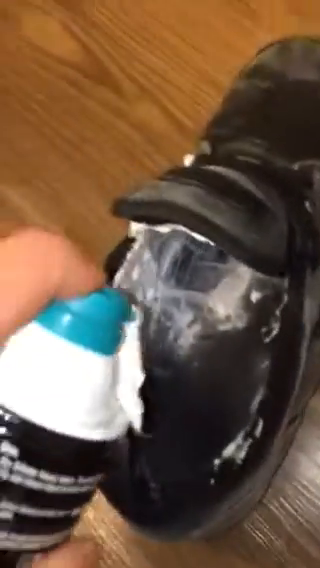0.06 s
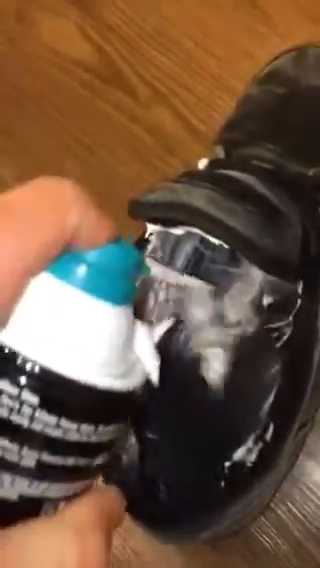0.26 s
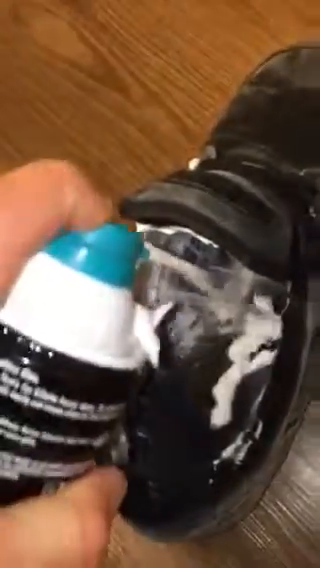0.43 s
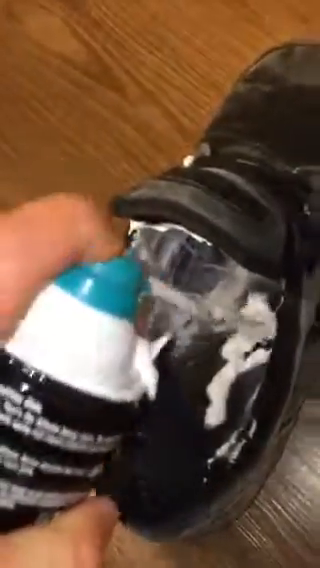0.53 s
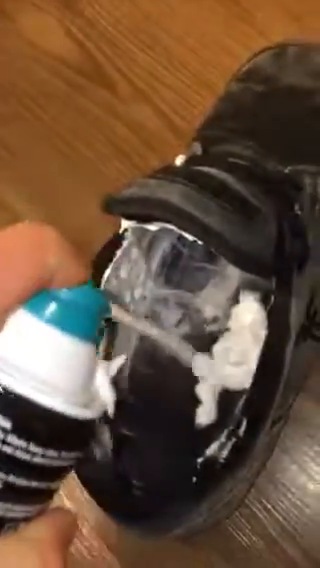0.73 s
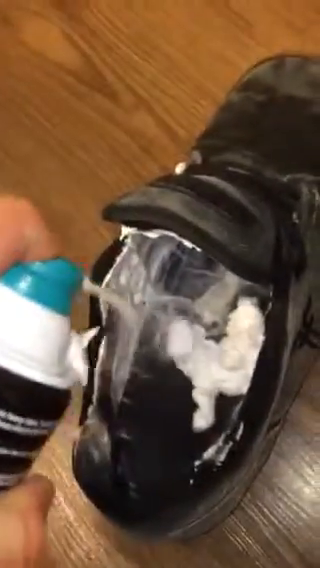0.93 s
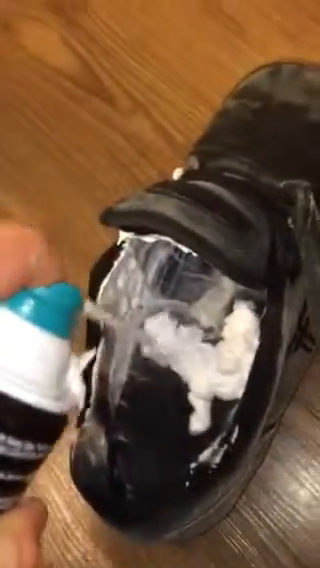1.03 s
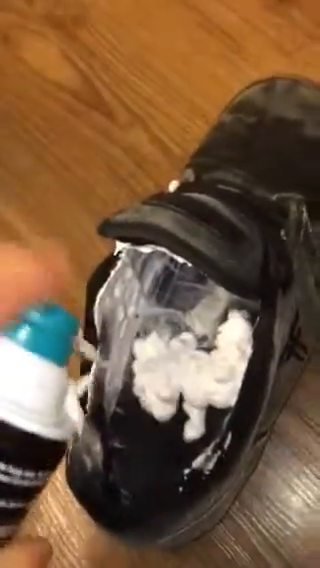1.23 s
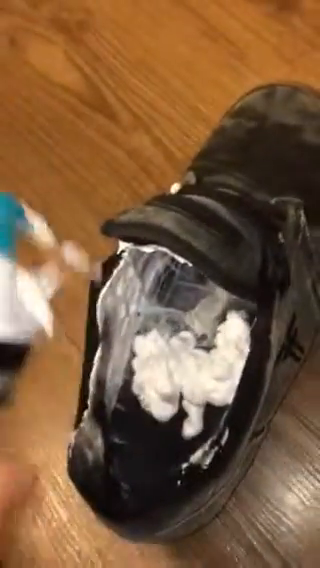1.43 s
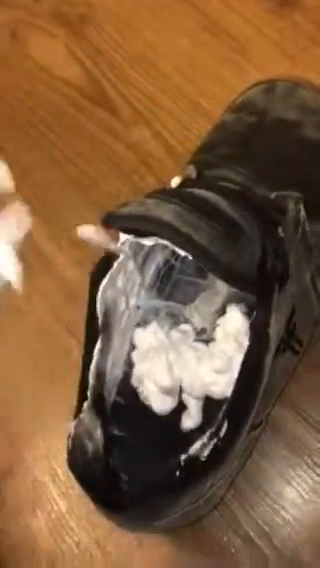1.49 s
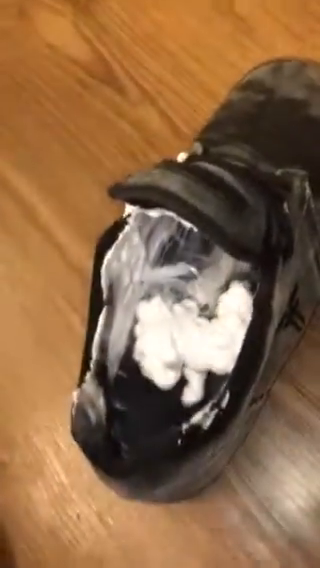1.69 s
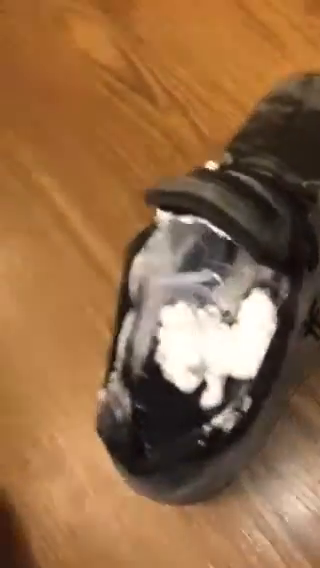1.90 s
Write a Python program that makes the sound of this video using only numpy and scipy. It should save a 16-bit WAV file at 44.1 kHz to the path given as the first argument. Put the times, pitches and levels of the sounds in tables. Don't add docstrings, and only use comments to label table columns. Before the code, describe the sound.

Spray foam squirts from a pressurised can into a shoe, heard close on a phone in a quiet room. Low room hum until 0.16 s, then a faint valve tick and a loud, spitting gassy burst around 0.2-0.3 s. A softer, dense bubbly hiss follows, crackling with little pops and growing stronger until it cuts off at 1.3 s. Short room ring, then faint ticks near 1.34, 1.7 and 1.95 s.

```python
import sys
import numpy as np
from scipy import signal
from scipy.fft import rfft, irfft
from scipy.io import wavfile
from scipy.ndimage import uniform_filter1d

SR = 44100
rng = np.random.default_rng(int(sys.argv[2]) if len(sys.argv) > 2 else 0)


def voltage_ratio(level):
    return 10 ** (np.asarray(level, float) / 20)


def transcribe(u):
    v = np.clip(np.atleast_2d(u).T, -1, 1)
    q = np.round(v * 32767).astype(np.int16)
    wavfile.write(sys.argv[1], SR, q)


N = 85995

# (frequency [Hz], density [dB per Hz])
AIR_WASH = [(12, -81), (20, -67), (59, -9.5), (180, -4), (213, -11), (465, -18.5), (767, -29), (932, -27.5),
            (15500, -54)]
# (frequency [Hz], width [Hz], level [dB])
HUM_BANDS = [(77.4, 29.4, -57.5), (114, 16.7, -56.5), (145.7, 9.7, -67), (184.3, 5.4, -58),
             (289.3, 8.1, -78.5), (390, 13, -76), (579.4, 25, -71.5), (1233, 30, -81), (467, 15, -69),
             (924, 30, -76)]
# (frequency [Hz], time to fall 60 dB [s])
ROOM_DECAY = [(500, .22), (1300, .35), (3000, .3), (4500, .4), (6500, .29), (12000, .22)]
# (frequency [Hz], width [Hz], depth [dB])
MIC_DIPS = [(4870, 310, -5), (10220, 1140, -5.5), (2500, 250, -4)]
# (time [s], level [dB])
TICKS = [
    (.162, -47),
    (1.339, -50),
    (1.7115, -45.5),
    (1.947, -55),
]
# (time [s], flow [dB], gas in the jet [dB], aim into the hollow [dB])
VALVE = [(0.158, -72, -19, -11), (0.161, -48, -19, 1), (0.185, -41.5, -15, -0.5), (0.206, -38.5, 9, 2.5),
         (0.252, -29, 3, -2), (0.289, -29, -6, 3.5), (.303, -33.5, 11.5, 0.5), (.325, -42.5, 3, -11),
         (.385, -40, -1.5, -1), (.6, -38, -1, 3.5), (.75, -36, -0.5, 1), (.86, -34.5, -1, 0.5),
         (1.0, -35.5, 1, 2), (1.06, -34, -2.5, 0), (1.2, -33.5, -1.5, 1.5), (1.272, -36.5, 3, 9.5),
         (1.287, -36, 0, -6), (1.296, -81, -3, -11)]
# (frequency [Hz], width [Hz], lift [dB])
SHOE_MODES = [(397.4, 85, 24.5), (960, 43, 2.5), (1370, 550, 3), (2090, 510, 7.5), (2706, 110, 5.5),
              (3057, 110, 5), (3756, 130, 4), (4525, 286, 6), (5430, 280, 6), (6550, 180, 4.5),
              (7540, 500, 0.5), (8930, 270, 5)]
# (frequency [Hz], level [dB])
HISS_COLOUR = [(600, -46), (1500, -8.5), (4000, -16.5), (7000, -24.5), (10000, -16), (13000, -22),
               (15800, -20)]
# (time [s], level [dB], centre [Hz], length [ms])
SPITS = [(0.1712, -53, 8300, 2.1), (0.1809, -47, 10300, 2.4), (0.1896, -42, 10800, 2.1),
         (0.1937, -32.5, 8300, 2.6), (0.216, -29, 10400, 1.9), (0.2239, -38, 10300, 2.7),
         (0.2286, -39, 10900, 2.0), (0.2327, -41, 10200, 2.7), (0.2409, -36, 11200, 2.5),
         (0.2543, -40.5, 11990, 2.3), (0.275, -38.5, 9900, 2.0), (0.2943, -39, 9960, 4.1),
         (0.3064, -32, 12100, 2.3), (0.312, -46, 12000, 2.3), (0.431, -55.5, 11600, 1.8),
         (0.5546, -33, 8100, 1.9), (0.5623, -54, 9400, 2.9), (0.5932, -49, 9200, 1.4),
         (0.612, -43, 8900, 1.4), (0.6204, -39, 8600, 1.2), (0.6733, -55, 9100, 2.1),
         (0.7134, -41, 8400, 1.1), (0.7211, -39, 8500, 1.9), (0.753, -43, 9200, 1.9),
         (0.7611, -48.5, 8800, 2.1), (0.8144, -47, 9400, 1.8), (0.8444, -42, 8800, 1.5),
         (0.8507, -39, 8150, 3.5), (0.8707, -42, 11700, 1.4), (0.8808, -39, 8300, 2.5),
         (0.924, -26.5, 8800, 1.9), (0.939, -40, 10200, 1.4), (0.9703, -38, 8900, 4.2),
         (0.985, -33.5, 8400, 1.9), (0.9925, -35, 9250, 2.5), (0.9998, -33, 8700, 1.5),
         (1.0167, -39, 9000, 1.3), (1.0306, -43, 10900, 1.5), (1.094, -44, 10000, 4.8),
         (1.1152, -41, 8600, 3), (1.136, -37.5, 10400, 4), (1.1435, -36.5, 9400, 1.2),
         (1.1706, -35.5, 9000, 1.4), (1.1786, -38, 9700, 1.3), (1.2295, -43, 9000, 1.1),
         (1.242, -47, 8600, 2.1), (1.2467, -40, 9400, 4.1), (1.2507, -47, 12600, 4.4),
         (1.272, -39, 9000, 1.5), (1.2831, -48, 9600, 1.9)]
# (time [s], level [dB], pitch [Hz], length [ms])
LARGE_POPS = [(0.172, -38.5, 2090, 2.1), (0.173, -36.5, 4330, 1.4), (0.2022, -33, 1754, 2.3),
              (0.202, -30, 5480, 1.3), (0.2104, -24, 2080, 1.54), (0.2119, -32, 5517, 3),
              (0.2165, -27.5, 6780, 2), (0.2237, -23.5, 2737, 1.66), (0.2234, -22, 5500, 1.0),
              (0.2323, -28, 5400, 1.7), (0.2407, -31.5, 4330, 2.1), (0.2547, -16.5, 2500, 1.41),
              (0.2536, -23, 3990, 3.1), (0.2897, -24.5, 1992, 1.98), (0.2837, -24, 2118, 3.1),
              (0.2637, -19.5, 3086, 1.88), (0.2758, -20, 2047, 1.8), (0.2808, -27, 5470, 2.4),
              (0.2891, -24, 4110, 2.5), (0.2868, -21, 2422, 1.6), (0.2707, -21, 2713, 1.57),
              (0.2925, -30, 3164, 1.0), (0.3259, -30, 3145, 1.5), (0.293, -29, 6620, 1.5),
              (0.3031, -27, 6440, 1.65), (0.4324, -33, 6895, 1.3), (0.4595, -35, 6895, 1.3),
              (0.4566, -27.5, 4425, 1.44), (0.496, -38.5, 6780, 1.3), (0.496, -32, 4500, 1.74),
              (0.5987, -26, 4240, 1.3), (0.6047, -28, 4139, 1.14), (0.6407, -35.5, 5862, 2.1),
              (0.7129, -30.5, 5780, 2.5), (0.7209, -37, 7929, 1.3), (0.7253, -26, 3400, 1.3),
                (0.7523, -31.5, 6895, 1.7), (0.825, -31.5, 6895, 1.7), (0.85, -38, 7929, 2.4),
                (0.8518, -25, 6140, 1.3), (0.857, -24.5, 3794, 3.9), (0.8805, -35.5, 7900, 2.15),
                (0.9223, -27, 6850, 1.3), (0.9371, -31, 3770, 1.7), (0.9796, -30, 2080, 1.7),
                (0.984, -29, 5890, 1.3), (0.9854, -36, 7660, 1.3), (0.9927, -39, 7929, 1.3),
                (0.9999, -35, 8273, 1.0), (1.0917, -34, 7929, 3.3), (1.1189, -26, 4483, 4.1),
                (1.1323, -27, 3420, 1.64), (1.135, -27.5, 5780, 3.5), (1.1594, -23.5, 1373, 1.82),
                (1.221, -43, 6895, 1.3), (1.23, -37, 8800, 1.2), (1.24, -34, 7584, 1.3),
                (1.2597, -27, 3480, 4.3), (1.2656, -34.5, 1063, 1.4), (1.2723, -21, 3910, 1.0),
                (1.2512, -36.5, 4170, 2.35), (1.194, -28, 4380, 3)]
# (frequency [Hz], density [dB per Hz])
FOAM_COLOUR = [(500, 4.5), (927, 2.5), (2070, -4), (3630, -2.5), (5590, -8), (8800, -21.5), (10500, -42),
               (15500, -48)]

TIME = np.arange(N) / SR
FLOW, GAS, AIM = 1, 2, 3


def evened(x):
    return x / np.sqrt(np.mean(x ** 2) + 1e-20)


def read(points, hz):
    f, value = np.transpose(points)
    return np.interp(np.log(hz + 1), np.log(f + 1), value)


def colour(x, db_at):
    hz = np.fft.rfftfreq(len(x), 1 / SR)
    return irfft(rfft(x) * voltage_ratio(db_at(hz)), len(x))


def peaks_db(modes, hz):
    return sum(db / (1 + (2 * (hz - f) / width) ** 2) for f, width, db in modes)


def bell_db(hz, centre, spread):
    return -20 * np.log10(1 + (np.log((hz + 1) / centre) / spread) ** 4)


def drift(ms):
    hz = np.fft.rfftfreq(N, 1 / SR)
    slow = rfft(rng.standard_normal(N)) * np.exp(-(hz * ms / 1000) ** 2)
    return evened(irfft(slow, N))


def add(mix, s, sound):
    part = mix[round(s * SR) - len(sound) // 2:][:len(sound)]
    part += sound[:len(part)]


def air():
    out = voltage_ratio(-53) * evened(colour(rng.standard_normal(N), lambda hz: read(AIR_WASH, hz)))
    for f, width, db in HUM_BANDS:
        band = colour(rng.standard_normal(N), lambda hz: -20 * np.log10(1 + (2 * (hz - f) / width) ** 2))
        band = band / abs(signal.hilbert(band)) ** .4
        wander_db = 2.5 * drift(ms=180)
        out = out + voltage_ratio(db + wander_db) * evened(band)
    return out


def room(x):
    taps = np.zeros(SR // 2)
    at = np.arange(200, SR // 2 - 20, 20)
    taps[at + rng.integers(0, 20, len(at))] = rng.choice([-1., 1.], len(at))
    hz, t, z = signal.stft(taps, SR, nperseg=256)
    decay = voltage_ratio(-60 * t / read(ROOM_DECAY, hz)[:, None])
    tail = signal.istft(z * decay, SR, nperseg=256)[1]
    return signal.fftconvolve(x, tail / np.linalg.norm(tail))[:N]


def ticks():
    snap_hz, body_hz, decay_ms, dull_hz = 2100, 650, 1.2, 2800
    out, t = np.zeros(N), np.arange(400) / SR
    body = voltage_ratio(-3) * np.exp(-t * 400 / decay_ms) * np.sin(2 * np.pi * body_hz * t)
    for s, db in TICKS:
        ragged = np.sin(2 * np.pi * snap_hz * t) + .6 * rng.standard_normal(400)
        snap = np.exp(-t * 1000 / decay_ms) * ragged + body
        add(out, s, voltage_ratio(db) * np.r_[0 * t, snap])
    return colour(out, lambda hz: -10 * np.log10(1 + (hz / dull_hz) ** 2))


def valve(column):
    rows = np.array(VALVE)
    return np.interp(TIME, rows[:, 0], rows[:, column])


def shoe_db(hz):
    foot_hz, floor_db = 760, -18
    foot = 1 / (1 + (foot_hz / (hz + 1)) ** 16) + voltage_ratio(2 * floor_db)
    return peaks_db(SHOE_MODES, hz) + 10 * np.log10(foot)


def spits():
    out, t = np.zeros(N), (np.arange(600) - 300) / SR * 1000
    for (s, db, hz, ms), rag in zip(SPITS, rng.standard_normal((len(SPITS), 600))):
        u = t / ms
        jet = colour(rag, lambda f: bell_db(f, hz, spread=0.17))
        shape = np.exp(-np.where(u < 0, 5, 2) * u ** 2)
        add(out, s, voltage_ratio(db - 4) * evened(jet * shape) * np.sqrt(np.mean(shape ** 2)))
    return out


def blip(hz, ms, rag):
    glide, roughness, puff_db = .05, .45, -5
    u = (np.arange(600) - 300) / SR * 1000 / ms
    tone = np.sin(2 * np.pi * np.cumsum(hz * (1 + glide * u)) / SR)
    wobble = 1 + roughness * evened(uniform_filter1d(rag, size=12))
    puff = evened(colour(rag[::-1], lambda f: bell_db(f, hz, spread=.3)))
    return np.exp(-2.8 * u ** 2) * wobble * tone + voltage_ratio(puff_db) * np.exp(-4.5 * u ** 2) * puff


def large_pops():
    out, rows = np.zeros(N), LARGE_POPS
    for (s, db, hz, ms), rag in zip(rows, rng.standard_normal((len(rows), 600))):
        add(out, s, voltage_ratio(db - 1.2) * blip(hz, ms, rag))
    return out


def crackles():
    per_s, low_hz, top_hz, shortest_ms = 220, 3500, 8500, .55
    out = np.zeros(N)
    flow_db = np.minimum(valve(FLOW), -34) + .5 * valve(GAS)
    for at, pitch, size, length in rng.random((int(per_s * N / SR), 4)):
        hz = low_hz * (top_hz / low_hz) ** pitch
        n = int(400 + at * (N - 800))
        burst = blip(hz, shortest_ms * (1 + length), rng.standard_normal(600))
        add(out, n / SR, voltage_ratio(flow_db[n] - 12 + 11.6 * size ** 2) * burst)
    return out


def nozzle():
    hiss = evened(colour(rng.standard_normal(N), lambda hz: read(HISS_COLOUR, hz) + shoe_db(hz)))
    flicker_db = 1.6 * drift(ms=14)
    return voltage_ratio(-11.5 + valve(FLOW) + valve(GAS) + flicker_db) * hiss


def foam(count=32):
    bubbles_per_s, cycles, size_db = 6500, 2.91, 1.5
    bursts = rng.random(N) < bubbles_per_s / SR
    size = voltage_ratio(size_db * np.minimum(rng.exponential(1, N), 4)) * bursts
    kind, out = rng.integers(0, count, N), np.zeros(N)
    for k, hz in enumerate(np.geomspace(650, 15000, count)):
        u = np.arange(0, 3 * cycles, hz / SR)
        ring = u * np.exp(-4 * u / cycles) * np.sin(2 * np.pi * u)
        ring = ring / np.linalg.norm(ring)
        level = voltage_ratio(read(FOAM_COLOUR, hz)) * np.sqrt(hz)
        out += level * signal.oaconvolve(size * (kind == k), ring)[:N]
    clump_db = (1.42 + 0.04 * (TIME < .3)) * drift(ms=2)
    return voltage_ratio(valve(FLOW) + clump_db) * evened(colour(out, shoe_db))


def filling(x):
    low = colour(x, lambda hz: -10 * np.log10(1 + (hz / 1690) ** 4))
    ring = colour(x, lambda hz: bell_db(hz, 4970, spread=0.36))
    fill_db = 1 * (TIME - 1.92)
    return x + low * (voltage_ratio(fill_db) - 1) + ring * (voltage_ratio(valve(AIM)) - 1)


def scene():
    spray = filling(foam() + nozzle()) + large_pops() + crackles() + spits() + ticks()
    return (spray + voltage_ratio(-11) * room(spray) + air())[None]


def roll_off(x):
    return signal.sosfilt(signal.butter(12, 15720, fs=SR, output="sos"), x)


def record(dry):
    x = colour(dry[0], lambda hz: peaks_db(MIC_DIPS, hz))[None]
    band_limit = signal.firwin(511, 15760, window=("kaiser", 9), fs=SR)
    x = signal.oaconvolve(x, band_limit[None], "same")
    return roll_off(x)


dry = scene()
out = record(dry)
transcribe(out)
```